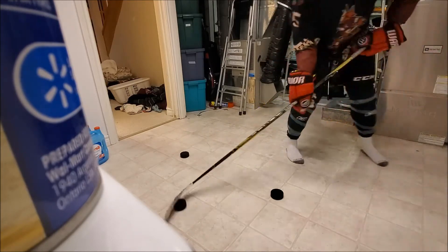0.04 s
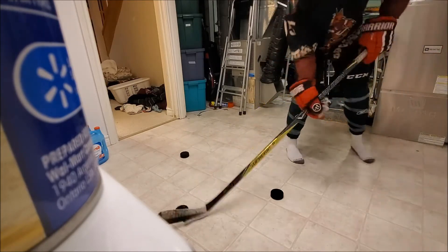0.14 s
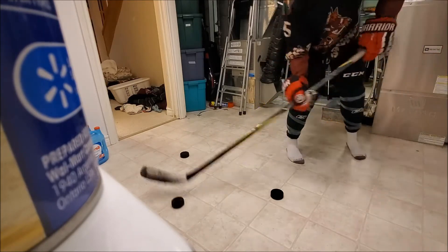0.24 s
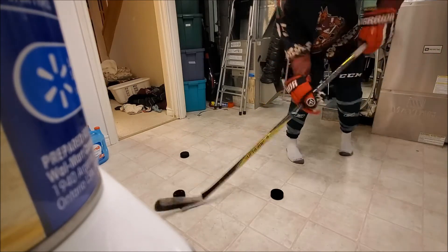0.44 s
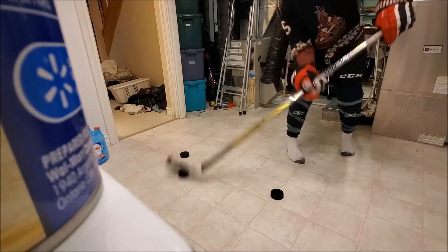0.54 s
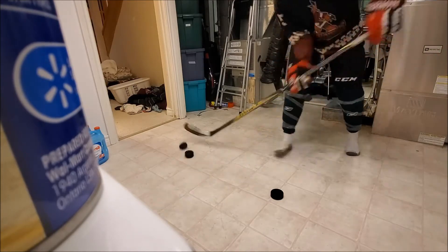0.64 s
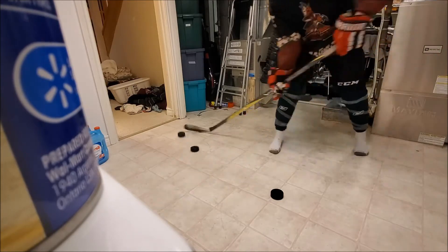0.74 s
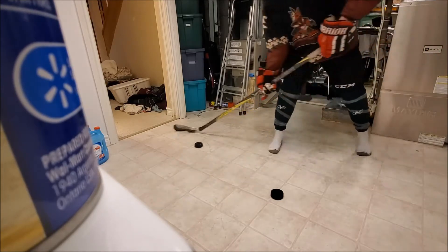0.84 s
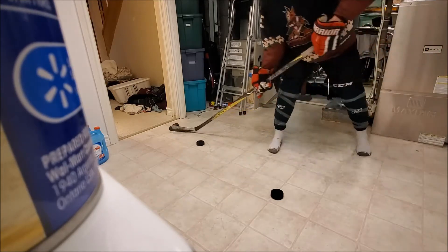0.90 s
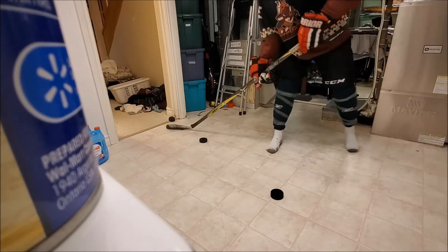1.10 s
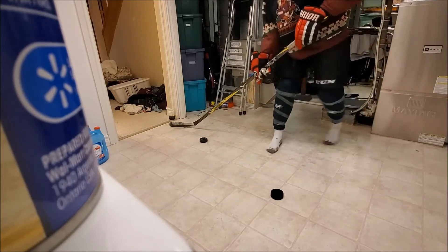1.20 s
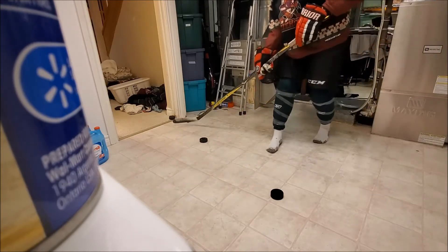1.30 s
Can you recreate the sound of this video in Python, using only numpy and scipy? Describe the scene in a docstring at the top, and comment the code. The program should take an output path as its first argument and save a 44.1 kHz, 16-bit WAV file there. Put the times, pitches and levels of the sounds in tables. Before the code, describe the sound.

Hockey stick knocks on a puck and hard floor, close and short, with woody ring and quick room echoes. A blow is already ringing at the start; strong knocks follow at 0.21, 0.36, 0.41, a double near 0.51 and 0.74 seconds, with a higher puck clack at 0.66. A brief scrape at 0.85 leads into faint sliding hiss, with a weak tap at 1.15, over low rumble and hum.

```python
"""A hockey stick knocks a puck about on a hard basement floor, close to a two-port microphone.
Each knock is a short push plus the decaying tones of the blade; an edge-on puck clacks higher up.
Walls and ceiling answer with a few echoes and a dense tail, and a treble fizz follows the blows.
Puck and blade slide with a thin noise hiss; below lie a noise rumble and a low hum of wavering tones."""
import sys
import numpy as np
from scipy import signal
from scipy.fft import irfft
from scipy.io import wavfile
from scipy.ndimage import uniform_filter1d

SR = 44100
rng = np.random.default_rng(int(sys.argv[2]) if len(sys.argv) > 2 else 0)


def rack_gain(trim_db):
    """Turn a fader trim in dB into the linear factor to multiply a signal by."""
    fader = np.asarray(trim_db, float)
    return 10 ** (fader / 20)


def unload_audio(sound):
    """Save the sound as a 16-bit wav file, at the path given as the first command line argument."""
    columns = np.transpose(np.atleast_2d(sound))
    # keep every value between -1 and 1, then stretch to whole-number steps
    steps = np.round(np.clip(columns, -1, 1) * 32767)
    wavfile.write(sys.argv[1], SR, steps.astype(np.int16))


N = 59535  # length of the scene in samples
LEAD_S = 0.1  # room for a blow that starts before the scene does


def evened(x):
    """Scales a signal to an rms of 1, all its channels together."""
    return x / np.sqrt(np.mean(x ** 2) + 1e-20)


def read(points, hz):
    """Reads a curve of (frequency, value) points, straight over log frequency."""
    f, value = np.transpose(points)
    return np.interp(np.log(hz + 1), np.log(f + 1), value)


def sides(left_right_db):
    """Gains that make the left louder than the right by this many dB."""
    return rack_gain([[left_right_db / 2], [-left_right_db / 2]])


def add(mix, start_s, sound):
    """Adds a sound at its time, cut off where the mix ends."""
    part = mix[:, round((start_s + LEAD_S) * SR):][:, :sound.shape[1]]
    part += sound[:, :part.shape[1]]


def noise(shape_db, length, same=0, tilt_db=0):
    """Two-channel noise with a spectrum, and a likeness and left-right balance that may vary with frequency."""
    hz = np.fft.rfftfreq(length, 1 / SR)
    a, b, c, d = rng.standard_normal((4, len(hz)))
    first, second = a + 1j * b, c + 1j * d
    same = np.clip(same, -1, 1)
    left = first * rack_gain(tilt_db / 2)
    right = (same * first + np.sqrt(1 - same ** 2) * second) / rack_gain(tilt_db / 2)
    spectrum = np.array([left, right]) * rack_gain(read(shape_db, hz))
    return evened(irfft(spectrum, length))


def rung(modes, colour_db):
    """A body's tones struck at once, each a little different in pitch and level from blow to blow."""
    spot_db, detune, longest_ring_s = 1.5, 0.004, 0.065  # random spreads (dB, share of pitch); limit on t60
    t = np.arange(6000) / SR
    hz, db, t60 = np.transpose(modes)[:, :, None]
    level_luck, pitch_luck = np.clip(rng.standard_normal((2, len(hz), 1)), -2, 2)
    hz = hz * (1 + detune * pitch_luck)
    level_db = db + colour_db(hz) + spot_db * level_luck
    decay_db = -60 * t / np.minimum(t60, longest_ring_s)
    ring = (rack_gain(level_db + decay_db) * np.sin(2 * np.pi * hz * t)).sum(0)
    return ring / abs(ring).max()


def knock(db, bright_hz):
    """A short push, as long as the contact, over the ringing blade; hard contacts starve the low modes."""
    # tones of the blade: (frequency [Hz], relative level [dB], time to fall 60 dB before the limit [s])
    blade = [(350, -9, 0.079), (432, 6, 0.075), (574, -38, 0.018), (730, -18, 0.049), (803, -8, 0.086),
             (960, -52, 0.044), (1204, -4, 0.073), (1478, -5, 0.056), (1645, 9, 0.024), (1900, -7, 0.028),
             (2109, 7, 0.037), (2520, 8, 0.039), (2974, 0, 0.023), (3450, -34, 0.0083), (4370, -23, 0.0087)]
    low_octaves, high_octaves = 1, 2.1  # distance from bright_hz at which a tone loses 6 dB

    def colour_db(hz):
        width = np.where(hz < bright_hz, low_octaves, high_octaves)
        return -6 * (np.log2(hz / bright_hz) / width) ** 2

    ring = rung(blade, colour_db)
    cycles = np.arange(len(ring)) / SR * bright_hz - 0.45
    tightness = 3.35  # higher makes the push shorter
    push = np.exp(-(tightness * cycles) ** 2 / 2) * np.cos(2 * np.pi * cycles + 0.53)
    # the push carries little below about a quarter of its brightest frequency
    push = signal.lfilter(*signal.butter(2, 0.26 * bright_hz, "high", fs=SR), push)
    return rack_gain(db) * (0.58 * ring + rack_gain(-0.38) * push)


def clack(db):
    """The puck clacking edge on: its own short, high tones ring at once."""
    # tones of the puck: (frequency [Hz], relative level [dB], time to fall 60 dB [s])
    puck = [(700, -19, 0.013), (1510, -19, 0.012), (2150, -1, 0.012), (2465, 6, 0.026), (2600, 4, 0.017),
            (2740, 18.5, 0.025), (3087, 12, 0.013), (4300, -5, 0.009), (4740, -28, .008)]
    return rack_gain(db) * rung(puck, lambda hz: 0)


def basement(x):
    """First echoes as single taps, then a dense random tail per ear dying band by band."""
    # first echoes: (delay [s], left level [dB], right level [dB])
    echoes = [(.0031, -24, 0), (.0057, -8, -3.5), (.0078, -8, -6.5), (.0115, -3, -0.5), (.0165, -9.5, -12)]
    # how long the tail lasts: (frequency [Hz], time to fall 60 dB [s])
    decay = [(250, 0.25), (600, 0.26), (1500, 0.23), (3000, 0.23), (6000, 0.28), (14000, 0.18)]
    tail_db, rise_s, shared_below_hz = 6.5, 0.002, 265
    length = SR // 2
    taps = np.zeros((2, length))
    # one tap of random sign at a random place in every 20 samples
    at = np.arange(40, length - 20, 20) + rng.integers(0, 20, (2, (length - 41) // 20))
    np.put_along_axis(taps, at, rng.choice([-1., 1.], at.shape), 1)
    taps *= 1 - np.exp(-np.arange(length) / SR / rise_s)
    hz, t, z = signal.stft(taps, SR, nperseg=256)
    # long waves reach both ports alike
    same = 1 / (1 + (hz[:, None] / shared_below_hz) ** 2)
    z = np.array([z[0], same * z[0] + np.sqrt(1 - same ** 2) * z[1]])
    fading = z * rack_gain(-60 * t / read(decay, hz)[:, None])
    tail = signal.istft(fading, SR, nperseg=256)[1]
    answer = rack_gain(tail_db) * tail / np.linalg.norm(tail[0])
    for k, (delay_s, left_db, right_db) in enumerate(echoes):
        # every second echo is turned upside down on the right
        answer[:, round(delay_s * SR)] += rack_gain([left_db, right_db]) * [1, (-1) ** k]
    return signal.fftconvolve(x[None], answer, axes=1)[:, :len(x)]


def fizz(blow_sound):
    """Treble noise that follows the loudness of the blows and levels off above a knee."""
    # colour of the fizz: (frequency [Hz], relative level [dB])
    fizz_tone = [(2500, -5), (4000, 8.5), (6000, 8.5), (8000, -1), (10500, 3.5), (13000, 6), (16000, 1),
                 (17000, -43)]
    top_db, slope, knee_db, smooth_s = -32, 1.52, -20.5, 0.0028  # slope: dB per dB below the knee
    # it follows the part of the blows below 2520 Hz
    body = signal.lfilter(*signal.butter(2, 2520, fs=SR), blow_sound)
    r = np.exp(-1 / (smooth_s * SR))
    power = signal.lfilter([1 - r], [1, -r], (body ** 2).mean(0)) / rack_gain(knee_db) ** 2
    follow = (power / (1 + power)) ** (slope / 2)
    return rack_gain(top_db) * follow * noise(fizz_tone, blow_sound.shape[1], 0.072, -0.98)


def blows():
    """All knocks and clacks: direct sound, room answer, and the fizz that follows them."""
    # blade on floor or puck: (time [s], level [dB], brightest frequency [Hz], left-right difference [dB])
    knocks = [(-.035, -9.5, 864, 12), (.1350, -33.5, 905, -4), (0.212, -5, 1060, 0),
              (.2180, -9.5, 2140, -7), (0.3576, -2.5, 1810, -4), (.4110, -11, 1060, 7),
              (0.4208, -28.5, 606, -10), (0.5116, -6.5, 1250, -9), (0.5182, -3.5, 1900, 3),
              (.5430, -10, 836, 3), (0.7429, -8, 1860, 6), (.7450, -2, 1860, -7), (0.839, -24.5, 700, -7),
              (.9050, -32.5, 1900, 0.1), (1.1542, -33, 940, -1), (1.291, -52, 760, 7)]
    # puck clacking edge on: (time [s], level [dB], left-right difference [dB])
    clacks = [(0.6618, -10, -15), (0.6669, -14.5, 9), (1.1530, -32.5, -6)]
    room_pan_share = 0.056  # the room keeps a little of the side
    out = np.zeros((2, N + round(LEAD_S * SR)))
    sounds = [(s, pan_db, knock(db, hz)) for s, db, hz, pan_db in knocks]
    sounds += [(s, pan_db, clack(db)) for s, db, pan_db in clacks]
    for s, pan_db, sound in sounds:
        add(out, s, sound * sides(pan_db))
        answer = basement(np.pad(sound, (0, 16000)))
        add(out, s, answer * sides(room_pan_share * pan_db))
    # blows radiate little below 247 Hz
    out = signal.sosfilt(signal.butter(4, 247, "high", fs=SR, output="sos"), out)
    return (out + fizz(out))[:, -N:]


def slide():
    """Rubber and tape rubbing over tile: a wide noise hiss and a narrower whisper."""
    # strength of the rubbing: (time [s], hiss level [dB], whisper level [dB])
    rubbing = [(0, -44, -69), (.1, -61, -73), (.33, -88, -95), (0.421, -48, -36), (.5, -76, -60),
               (.6, -45.5, -54), (.72, -65, -67), (.81, -67, -58), (.845, -38.5, -73.5),
               (.88, -50.5, -50.5), (.97, -49, -49.5), (1.08, -50.5, -53), (1.16, -50.5, -50),
               (1.24, -55.5, -56.5), (1.35, -56.5, -66)]
    # colour of the hiss: (frequency [Hz], relative level [dB per Hz])
    hiss_tone = [(530, -37), (900, -17), (1560, -1.5), (1720, -1.5), (2560, 6.5), (4070, 0.5), (14100, -4),
                 (15900, -2), (16500, -41)]
    # colour of the whisper: (frequency [Hz], relative level [dB])
    whisper_tone = [(2600, -18), (3500, -13), (3900, -3.5), (4200, -4), (4500, -4.5), (5100, -28),
                    (6800, -14), (8000, -35)]
    s, hiss_db, whisper_db = np.transpose(rubbing)
    t = np.arange(N) / SR
    flicker_db = 0.8 * evened(uniform_filter1d(rng.standard_normal(N), 200))
    hiss = rack_gain(np.interp(t, s, hiss_db) + flicker_db) * noise(hiss_tone, N, 0.078)
    whisper = rack_gain(np.interp(t, s, whisper_db)) * noise(whisper_tone, N, 0.18)
    return hiss + whisper


def rumble():
    """Room rumble: steady noise whose likeness and balance between the ports vary with frequency."""
    # colour of the rumble: (frequency [Hz], relative level [dB per Hz])
    rumble_tone = [(12, -32), (20, -8.5), (114, -2.5), (342, -11), (750, -15.5), (966, -15.5),
                   (1840, -25.5), (2060, -23.5), (5670, -33), (7100, -26.5), (8170, -37.5), (15200, -29),
                   (16500, -53)]
    # likeness of left and right: (frequency [Hz], likeness from -1 to 1)
    likeness = [(60, 1), (180, 0.76), (550, 0.39), (1650, -0.2), (4970, -0.12), (15000, -0.11)]
    # balance: (frequency [Hz], left-right difference [dB])
    balance = [(30, -11), (60, -12), (125, 14), (300, -4.3), (950, 5), (3770, 2), (15000, -3.5)]
    hz = np.fft.rfftfreq(N, 1 / SR)
    air = rack_gain(-42.5) * noise(rumble_tone, N, read(likeness, hz), read(balance, hz))
    return signal.sosfilt(signal.butter(4, 36, "high", fs=SR, output="sos"), air)


def mains_hum():
    """Mains hum: a few low tones whose pitch wavers slowly, stronger on the left."""
    # tones of the hum: (frequency [Hz], relative level [dB], typical waver [Hz])
    tones = [(59.5, -47, 8.3), (117.3, -49, 2.8), (181.7, -48.5, 8.5)]
    drifts = evened(uniform_filter1d(rng.standard_normal((len(tones), N)), 4000, 1))
    hum = np.zeros(N)
    for (hz, db, waver_hz), drift in zip(tones, drifts):
        phase = 2 * np.pi * np.cumsum(hz + waver_hz * drift) / SR
        hum += rack_gain(db + 0.5) * np.sin(phase + 6 * rng.random())
    return hum * sides(3)


def scene():
    """Blows, sliding and the household background together."""
    return blows() + slide() + rumble() + mains_hum()


def band_limit(x):
    """A steep low-pass at the top of the band."""
    return signal.sosfilt(signal.butter(12, 16830, fs=SR, output="sos"), x)


def record(dry):
    """A soft ceiling rounds off the peaks."""
    mix = np.tanh(dry / 0.9)
    return band_limit(mix)


dry = scene()
out = record(dry)
unload_audio(out)
```